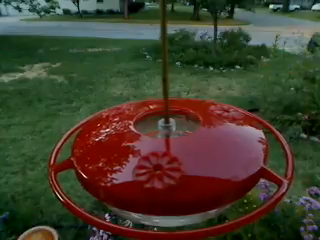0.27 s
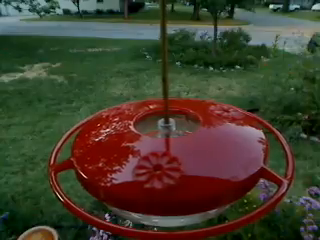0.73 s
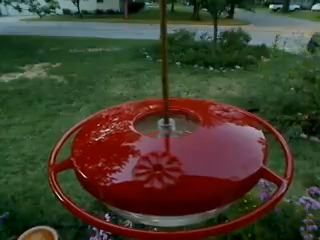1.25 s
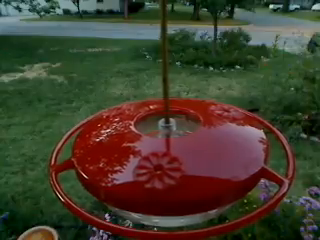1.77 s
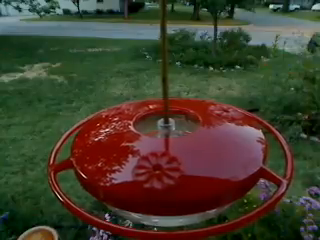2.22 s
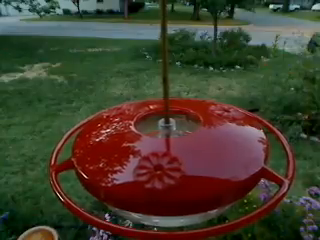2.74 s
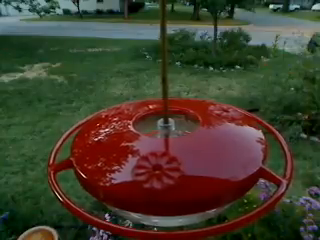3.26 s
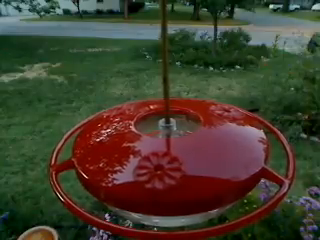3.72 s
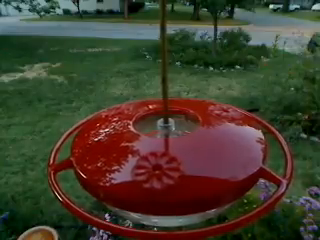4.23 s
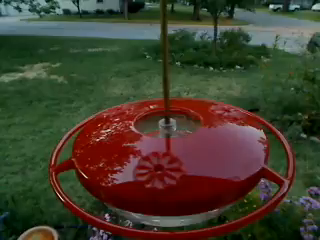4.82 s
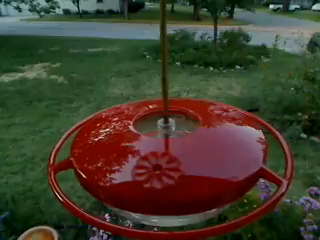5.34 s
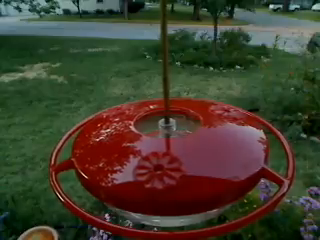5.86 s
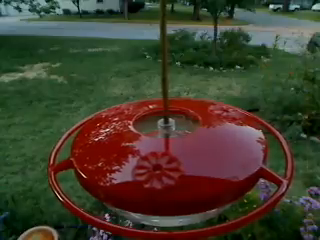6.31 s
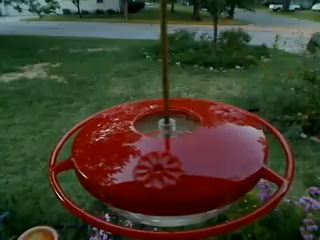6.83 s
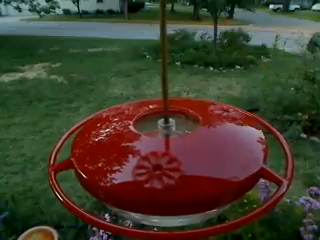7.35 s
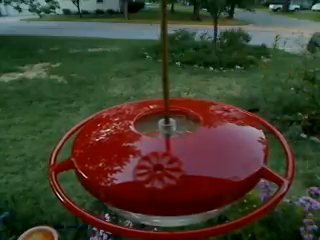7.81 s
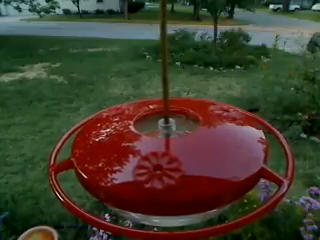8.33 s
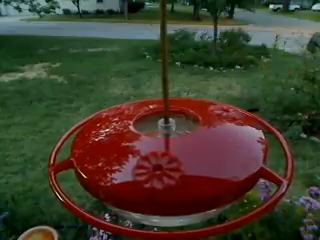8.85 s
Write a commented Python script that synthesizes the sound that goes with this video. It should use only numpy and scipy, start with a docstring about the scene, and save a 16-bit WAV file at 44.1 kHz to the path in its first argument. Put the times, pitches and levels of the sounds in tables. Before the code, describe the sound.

Outdoors in the evening, countless insects sing as one unbroken, shimmering high band, with far traffic rumble, air and faint hum below. Two faraway birds exchange short pure whistles early on, then stop. After a momentary dropout and an electric tick midway, a lower narrow band of distant singers gently swells; one more tick sounds shortly after. The mono sound is dull at the very top and coarsely compressed.

```python
"""An evening insect chorus over a lawn, heard by a small mono camera that thins weak bands throughout.
From the start many singers' clicks, ringing in wing bands, blur into a bright hiss over suburb rumble, air and hum.
Two distant birds whistle sine notes for under three seconds, while the chorus eases down until 4 s.
Near 4.8 s the signal drops out briefly and a tick marks its return; a low band of far singers then swells.
A second tick falls near 5.9 s; the rumble climbs slowly from first to last."""
import sys
import numpy as np
from scipy import signal
from scipy.fft import rfft, irfft, dct, next_fast_len
from scipy.io import wavfile
from scipy.ndimage import uniform_filter1d, map_coordinates

SR = 44100
rng = np.random.default_rng(int(sys.argv[2]) if len(sys.argv) > 2 else 0)


def int16_out(signal):
    """Quantize to a 16-bit WAV file."""
    q = np.round(np.clip(np.atleast_2d(signal).T, -1, 1) * 32767)
    wavfile.write(sys.argv[1], SR, q.astype(np.int16))


def linear_from_db(decibels):
    """Turn decibels (scalar or array-like) into linear amplitude factors; 0 gives 1."""
    return 10 ** (np.asarray(decibels, float) / 20)


N = 400412  # length in samples


def unit(x):
    """Scales a signal to rms 1."""
    return x / np.sqrt(np.mean(x ** 2) + 1e-20)


def along(points, hz):
    """Reads a curve of (Hz, value) points on a log frequency axis."""
    f, v = np.transpose(points)
    return np.interp(np.log(hz + 1), np.log(f + 1), v)


def fader(points):
    """Draws a level in dB for every sample through (s, dB) points."""
    return np.interp(np.arange(N) / SR, *np.transpose(points))


def wobble(rate):
    """Draws a smooth random curve with rate knots a second, 30 at most."""
    knots = rng.standard_normal(int(N * 30 / SR) + 4)
    position = np.arange(0, N, 16) * min(rate, 30) / SR
    curve = map_coordinates(knots, [position])
    return np.repeat(curve, 16)[:N]  # held for 16 samples


def filtered(x, response):
    """Multiplies the spectrum of x by a response of frequency."""
    m = next_fast_len(N + 8192)
    return irfft(rfft(x, m) * response(np.fft.rfftfreq(m, 1 / SR)), m)[..., :N]


def coloured(x, spectrum):
    """Filters x by a (Hz, dB) curve and brings it to rms 1."""
    return unit(filtered(x, lambda hz: linear_from_db(along(spectrum, hz))))


# tone of the suburb rumble: freq_hz [Hz], relative_level_db [dB per Hz]
RUMBLE_SPECTRUM = [(10, -2), (35, -5), (60, -0.5), (100, -1.5), (125, -6), (150, -12.5), (220, -10),
                   (240, -40.5)]
RUMBLE_START_DB, RUMBLE_RISE_DB_PER_S = -46, 0.42


def rumble():
    """Low-pitched noise that climbs steadily while its level wavers."""
    t = np.arange(N) / SR
    level_db = RUMBLE_START_DB + RUMBLE_RISE_DB_PER_S * t + 1.2 * wobble(9)
    return linear_from_db(level_db) * coloured(rng.standard_normal(N), RUMBLE_SPECTRUM)


# tone of the air and far traffic: freq_hz [Hz], relative_level_db [dB per Hz]
AIR_SPECTRUM = [(130, -29), (225, -0.5), (280, -0.5), (556, -11), (712, -11), (1360, -19.5), (1730, -17),
                (1880, -23), (2000, -11.5), (2600, -42.5), (4400, -120)]


def air():
    """Air and far traffic as coloured noise with a slightly wavering level."""
    level_db = -52 + 0.45 * wobble(3.3)
    return linear_from_db(level_db) * coloured(rng.standard_normal(N), AIR_SPECTRUM)


# hum and whine tones: pitch_hz [Hz], level_db [dB, sine peak around which the level wavers]
HUM_TONES = [(59.2, -50), (235.5, -63.5), (1293.3, -74)]


def hum():
    """Sines whose levels and phases drift a little."""
    t = np.arange(N) / SR
    out = 0
    for pitch_hz, level_db in HUM_TONES:
        gain = linear_from_db(level_db + 2.9 * wobble(3.4))
        drift_rad = 0.42 * wobble(2.5)
        out = out + gain * np.sin(2 * np.pi * pitch_hz * t + drift_rad)
    return out


# band of the far low group: pitch_hz [Hz], width_hz [Hz, between half-amplitude points]
LOW_BAND = (2340, 140)
# swell of the far low group: start_s [s], level_db [dB, before pulsing]
LOW_SWELL = [(0, -62.5), (4.999, -60), (7.5, -52), (9.08, -51)]


def low_chorus():
    """A far group blurred by distance into one narrow pulsing band of noise."""
    pitch_hz, width_hz = LOW_BAND
    band = filtered(rng.standard_normal(N), lambda hz: 1 / (1 + (2 * (hz - pitch_hz) / width_hz) ** 2))
    return linear_from_db(fader(LOW_SWELL) + 1.5 * wobble(6.2)) * unit(band)


# whistles of two birds: start_s [s], note [name], level_db [dB, note peak before wavering]
BIRD_WHISTLES = [(.202, "rising", -25.5), (.611, "falling", -32.5), (.64, "short", -28),
                 (.966, "rising", -26), (1.27, "falling", -30), (1.349, "short", -27),
                 (1.711, "rising", -25.5), (1.96, "falling", -29), (2.017, "short", -25),
                 (2.51, "rising", -26), (2.64, "falling", -32.5)]
# kinds of bird note, by name: length_s [s], start_hz [Hz], end_hz [Hz]
BIRD_NOTES = {"rising": (0.13, 3705, 3730), "falling": (.19, 3570, 3490), "short": (.058, 3960, 3960)}


def birds():
    """Soft sine whistles, sliding or level in pitch, that waver on their way through the trees."""
    out = np.zeros(N)
    for start_s, note, level_db in BIRD_WHISTLES:
        length_s, start_hz, end_hz = BIRD_NOTES[note]
        u = np.arange(round(length_s * SR)) / (length_s * SR)  # 0 to 1 through the note
        phase = 2 * np.pi * length_s * (start_hz * u + (end_hz - start_hz) * u ** 2 / 2)
        shape = np.sin(np.pi * u ** 0.44) ** 0.54  # quick rise, slower fall
        out[round(start_s * SR):][:len(u)] += linear_from_db(level_db) * shape * np.sin(phase)
    return out * linear_from_db(2.2 * wobble(25))


def clicks(rate, scatter_db):
    """Wing clicks of a crowd at random moments, rate a second, with random sign and size."""
    struck = rng.random(N) < rate / SR
    sign = rng.choice([-1, 1], N)
    size = linear_from_db(scatter_db * rng.standard_normal(N))
    return unit(struck * sign * size)


# tone filter over all singers together: freq_hz [Hz], relative_level_db [dB]
CHORUS_SPECTRUM = [(1120, -63), (1900, -33.5), (2270, -26.5), (2730, -23), (3530, -4), (4780, 1),
                   (6120, -0.5), (6860, -7.5), (7480, -16), (9720, -44), (16500, -120)]
# easing of the main chorus: start_s [s], level_db [dB rms]
CHORUS_FADER = [(0, -20), (2, -20.5), (4, -21.5), (9.08, -21.5)]


def chorus(count=7):
    """Groups of singers, each ringing in its own wing band and swelling partly with the others."""
    pitches, step_hz = np.linspace(1900, 7700, count, retstep=True)
    shared_db = .2 * wobble(4) + .3 * wobble(9)
    m = next_fast_len(N)
    hz = np.fft.rfftfreq(m, 1 / SR)
    crowd = 0
    for pitch_hz in pitches:
        swell = linear_from_db(shared_db + 0.8 * wobble(5) + 0.41 * wobble(14))
        near = .5 * clicks(rate=3000, scatter_db=3)
        far = rng.standard_normal(N)  # far clicks blur to noise
        wing = np.cos(np.pi / 2 * np.clip((hz - pitch_hz) / step_hz, -1, 1))  # neighbours overlap evenly
        crowd = crowd + wing * rfft(swell * (near + far), m)
    return linear_from_db(fader(CHORUS_FADER)) * coloured(irfft(crowd, m)[:N], CHORUS_SPECTRUM)


def scene():
    """One microphone feeds both channels."""
    background = rumble() + air() + hum()
    mono = background + low_chorus() + birds() + chorus()
    return np.array([mono, mono])


# where narrow bands blink out: centre_hz [Hz], spread_hz [Hz], share [fraction of frames at the centre]
BLINK_BANDS = [(165, 75, .8), (1590, 70, .1), (1894, 70, 0.87), (2450, 500, .1), (2810, 120, .55),
               (7597, 150, .6)]
EDGE_HZ = 7100  # above it a muted band mutes all higher ones


def muted(z, width=7, first=1):
    """True where a narrow band is at its quietest against the moments around it."""
    count = (z.shape[1] - first) // width
    hz = (first + width * (np.arange(count) + .5)) * SR / (2 * z.shape[1])
    share = sum(top * np.exp(-((hz - centre_hz) / spread_hz) ** 4) for centre_hz, spread_hz, top in BLINK_BANDS)
    bands = z[:, first:first + count * width].reshape(len(z), count, width)
    power = uniform_filter1d(np.sum(bands ** 2, axis=2), size=2, axis=0)
    relative = power / (uniform_filter1d(power, size=20, axis=0) + 1e-20)
    rank = np.argsort(np.argsort(relative, axis=0), axis=0)  # 0 is the quietest frame
    off = rank < share * len(z) - .5
    off = off | (np.cumsum(off * (hz > EDGE_HZ), axis=1) > 0)
    rest = z.shape[1] - first - count * width
    return np.pad(np.repeat(off, width, axis=1), [(0, 0), (first, rest)])


# coarseness of the stored sound: freq_hz [Hz], step_db [dB, rounding step over the usual level]
STORED_STEP = [(100, 4), (300, 4), (1000, -2), (1800, 5), (2300, 8), (2850, 10), (3400, 4), (6800, 1),
               (7500, 9)]
TOP_HZ = 7630


def thinned(x, size=1536):
    """The camera stores lapped cosine frames coarsely and mutes weak bands while they are quietest."""
    frames = N // size + 2
    window = signal.windows.kaiser_bessel_derived(2 * size, 4 * np.pi)
    x = np.pad(x, (size, (frames + 1) * size - N - size)).reshape(-1, size)
    a, b, c, d = np.split(np.hstack([x[:-1], x[1:]]) * window, 4, axis=1)
    z = dct(np.hstack([-c[:, ::-1] - d, a - b[:, ::-1]]), type=4, norm="ortho")
    hz = (np.arange(size) + .5) * SR / (2 * size)
    usual = np.sqrt(uniform_filter1d(np.mean(z ** 2, axis=0), size=5) + 1e-20)
    step = linear_from_db(along(STORED_STEP, hz)) * usual
    kept = np.round(z / step) * step * (hz < TOP_HZ) * ~muted(z)
    # back to sound: unfold each frame and overlap it with the next
    u, v = np.split(dct(kept, type=4, norm="ortho"), 2, axis=1)
    out = np.hstack([v, -v[:, ::-1], -u[:, ::-1], -u]) * window
    return (out[1:, :size] + out[:-1, size:]).ravel()[:N]


CUT_S, RETURN_S = 4.779, 4.8367
TRACE_DB, TRACE_S = -17.5, 0.031  # fades after the cut
LEAD_DB, LEAD_S = -31, 0.021  # grows before the return
RECOVER_DB, RECOVER_S = -6, .01  # starting gain and length of the recovery


def dropout():
    """Gain that falls to a fading trace and recovers, and a mask of where the signal is on."""
    t = np.arange(N) / SR
    trace = linear_from_db(TRACE_DB) * np.sqrt(np.clip(1 - (t - CUT_S) / TRACE_S, 0, 1))
    lead = linear_from_db(LEAD_DB) * np.clip(1 - (RETURN_S - t) / LEAD_S, 0, 1)
    back = linear_from_db(RECOVER_DB * np.clip(1 - (t - RETURN_S) / RECOVER_S, 0, 1))
    gain = np.where(t < CUT_S, 1, np.where(t < RETURN_S, trace + lead, back))
    return gain, (t < CUT_S) | (t >= RETURN_S)


# electric ticks: start_s [s], level_db [dB, spike before its treble is rounded off], top_hz [Hz]
TICK_SPIKES = [(4.8367, -12, 10000), (5.8976, -10, 11800)]


def ticks():
    """Single-sample spikes, their spectrum rounded off towards the top."""
    out = 0
    for start_s, level_db, top_hz in TICK_SPIKES:
        spike = linear_from_db(level_db) * (np.arange(N) == round(start_s * SR))
        out = out + filtered(spike, lambda hz: np.clip(3.5 * (1 - hz / top_hz), 0, 1))
    return out


def band_limit(x):
    """A steep low-pass at the top of the band."""
    return signal.sosfilt(signal.butter(12, 12500, fs=SR, output="sos"), x)


def record(dry):
    """Thins the sound, drops it out over a faint hiss, adds a small offset, limits the band and adds ticks."""
    gain, on = dropout()
    hiss = ~on * linear_from_db(-33) * rng.standard_normal(N)  # only in the gap, before the dropout gain
    offset = .0167 * on  # constant shift, full scale 1
    x = gain * (thinned(dry[0]) + hiss) + offset
    x = filtered(x, lambda hz: np.clip((TOP_HZ + 200 - hz) / 200, 0, 1)) + ticks()
    return band_limit(np.array([x, x]))


dry = scene()
out = record(dry)
int16_out(out)
```